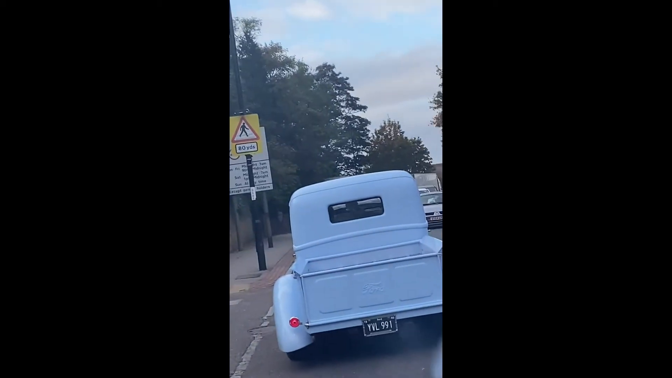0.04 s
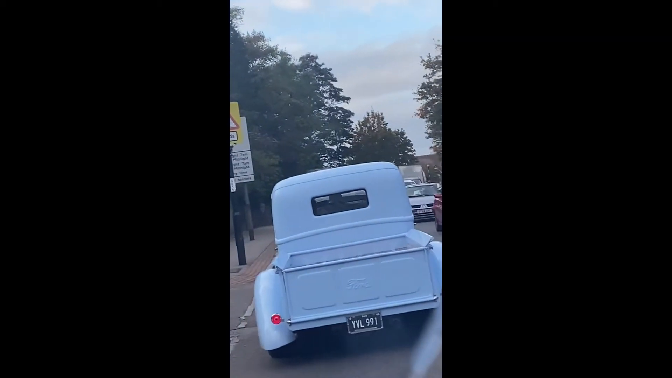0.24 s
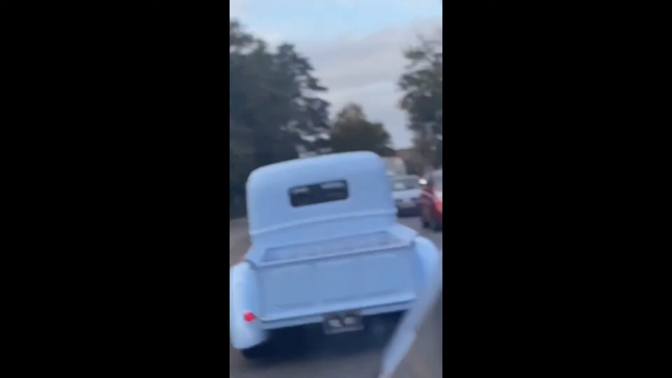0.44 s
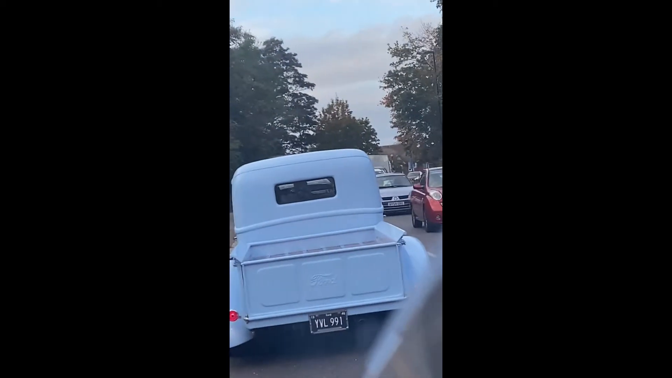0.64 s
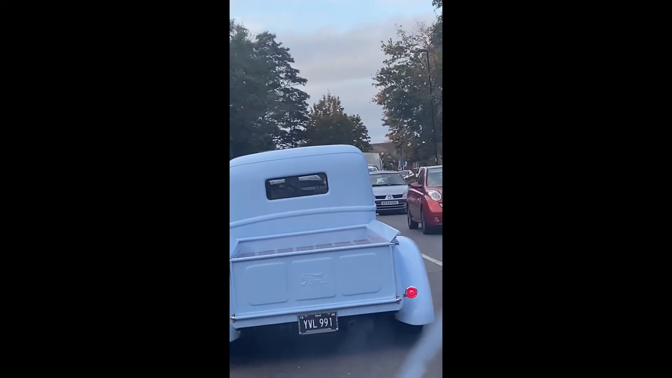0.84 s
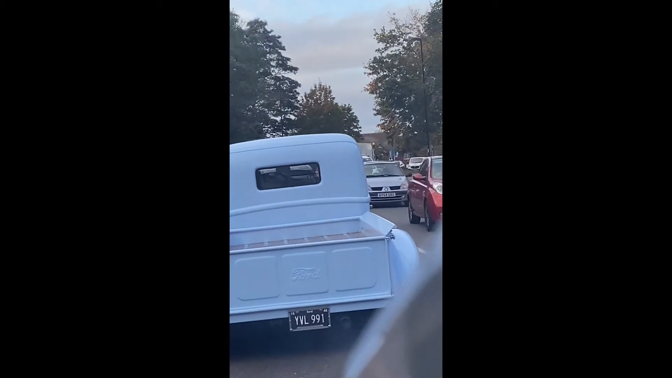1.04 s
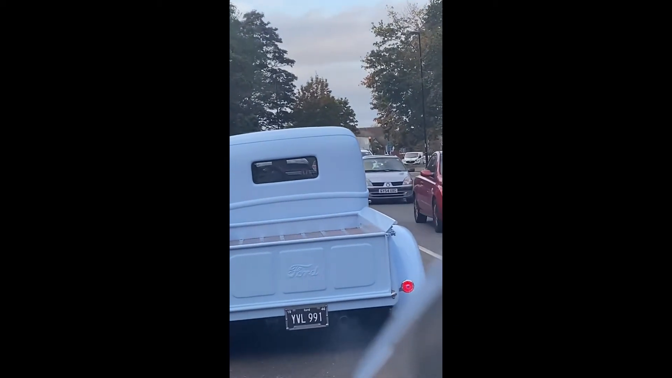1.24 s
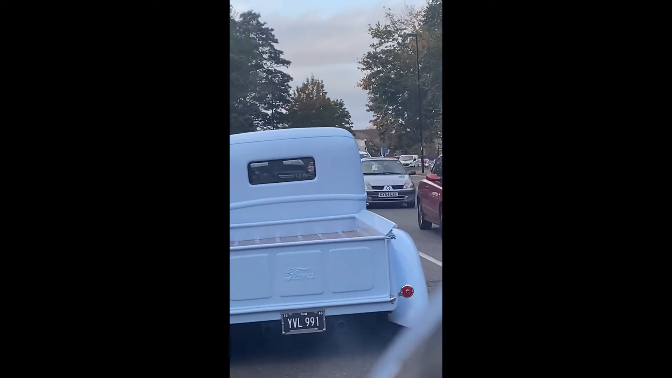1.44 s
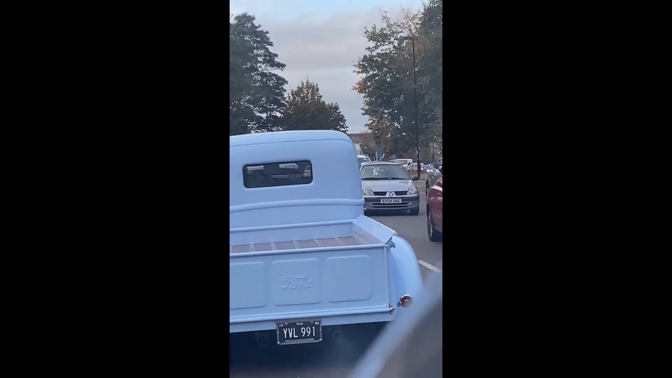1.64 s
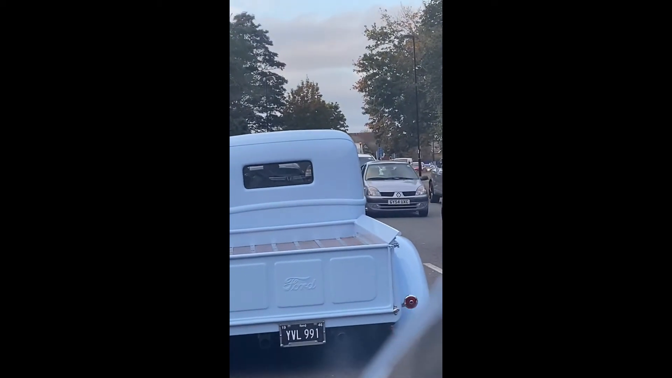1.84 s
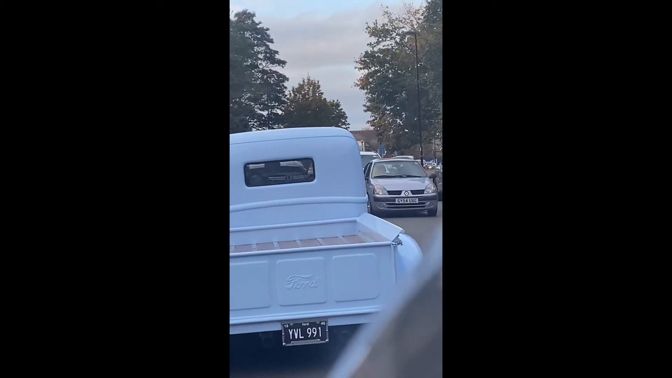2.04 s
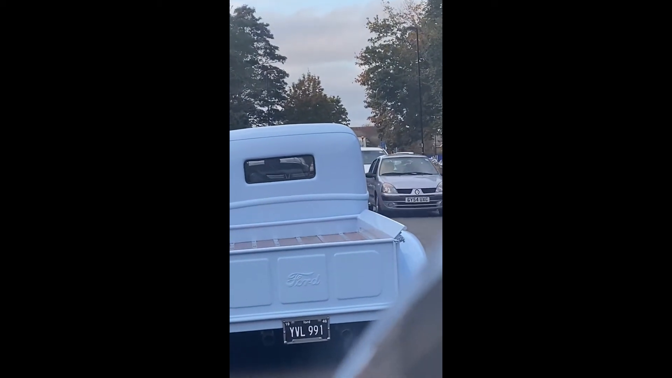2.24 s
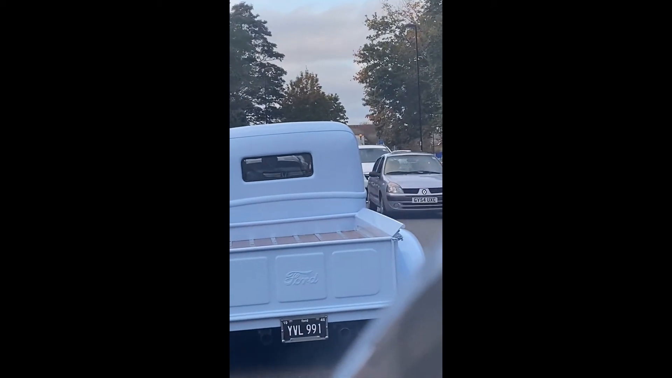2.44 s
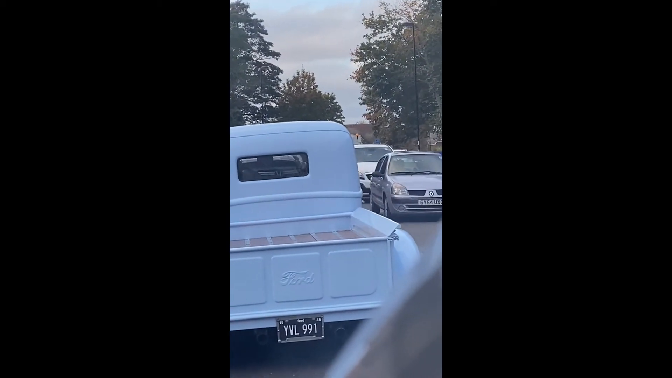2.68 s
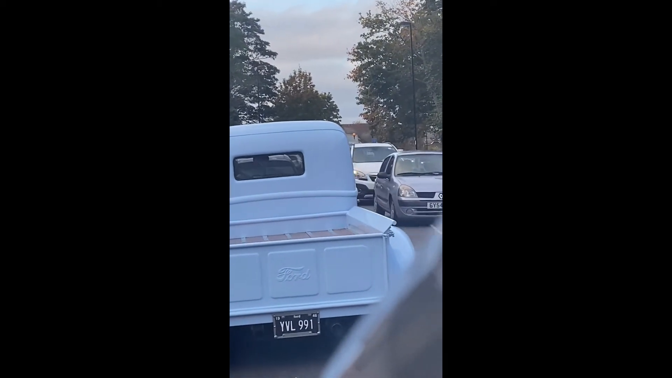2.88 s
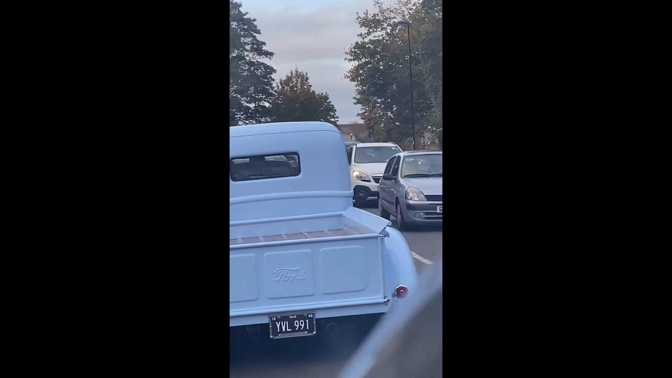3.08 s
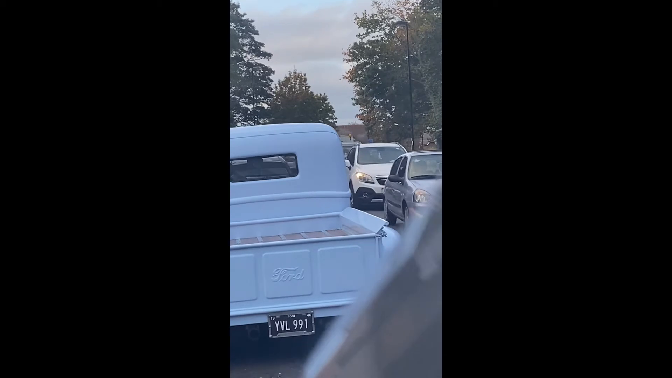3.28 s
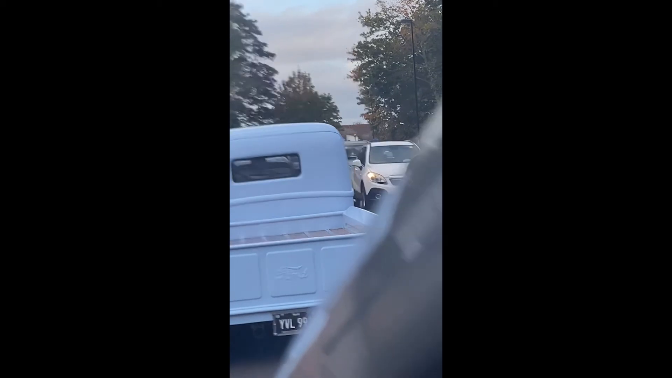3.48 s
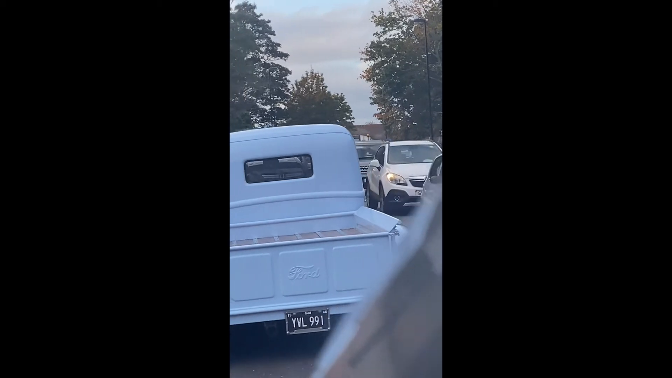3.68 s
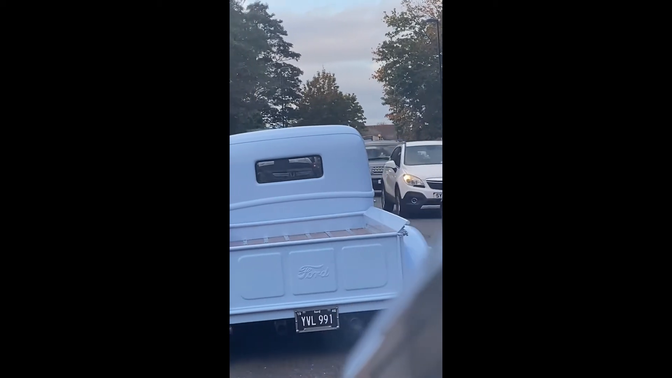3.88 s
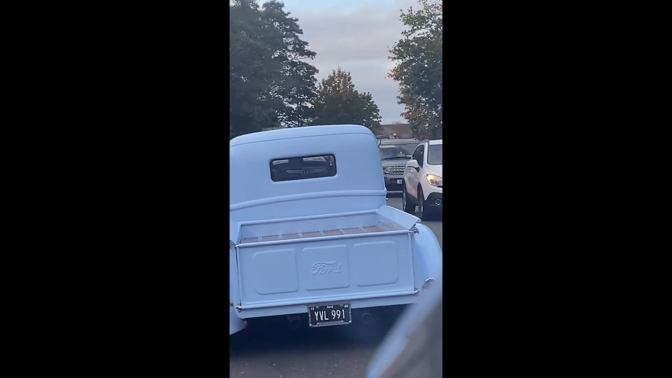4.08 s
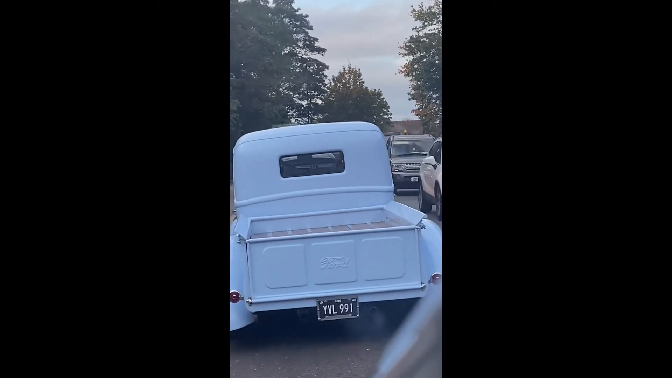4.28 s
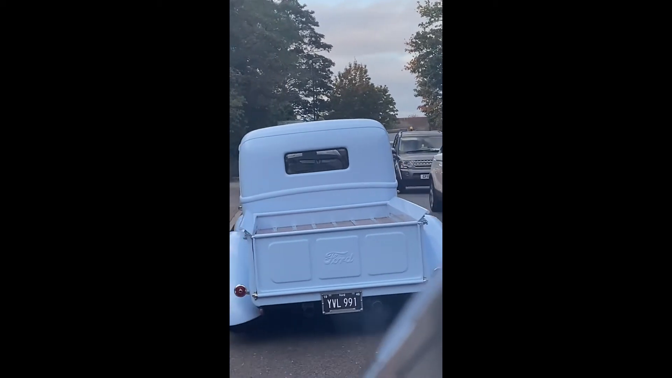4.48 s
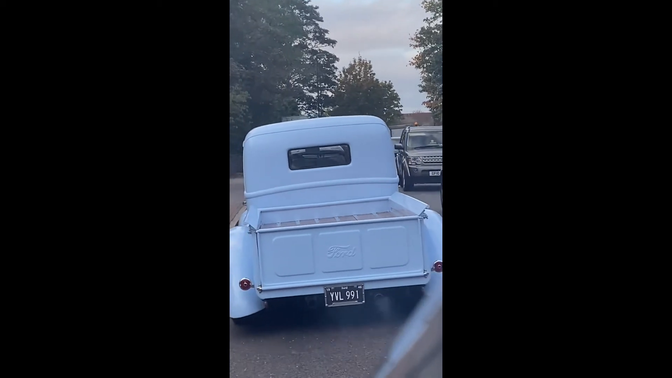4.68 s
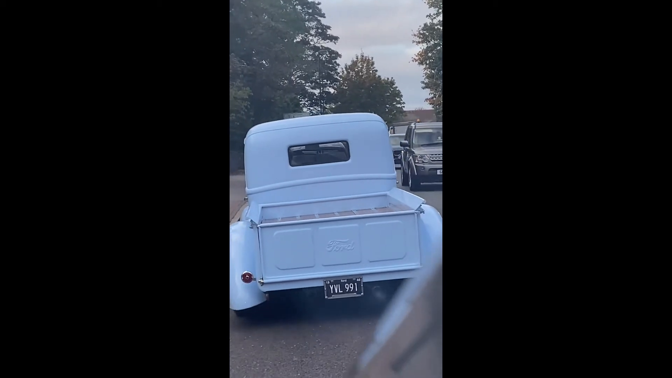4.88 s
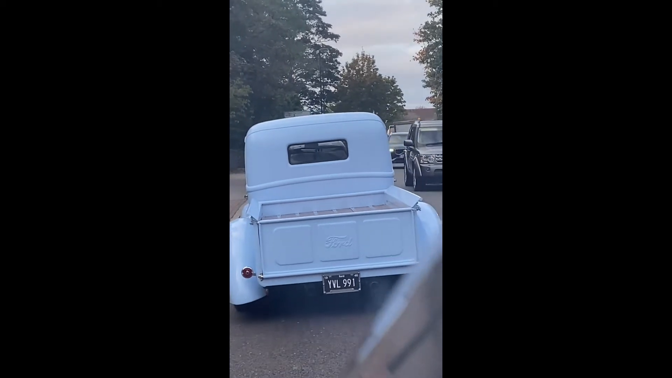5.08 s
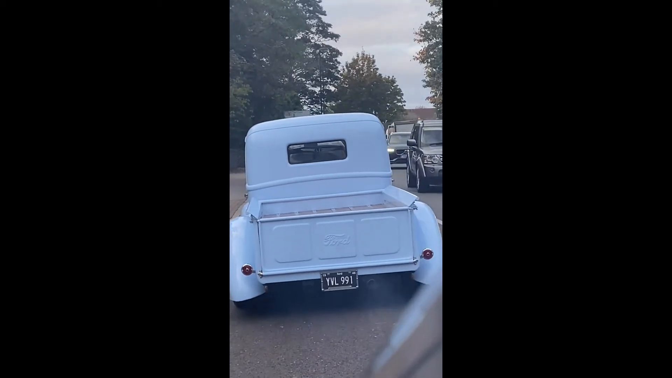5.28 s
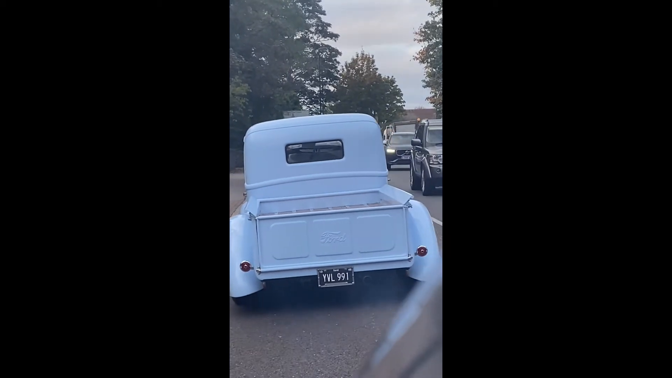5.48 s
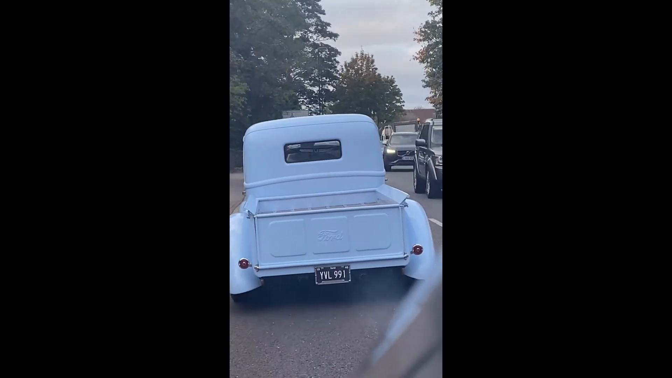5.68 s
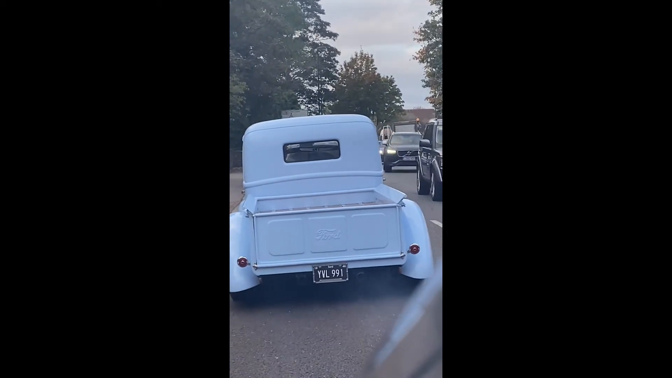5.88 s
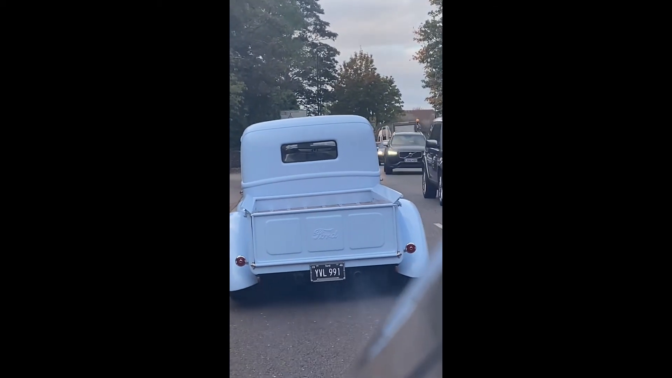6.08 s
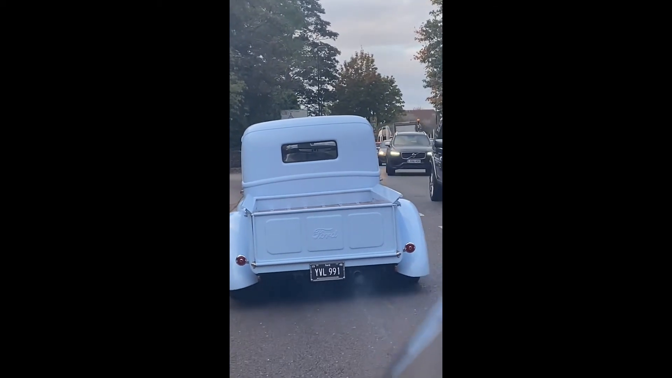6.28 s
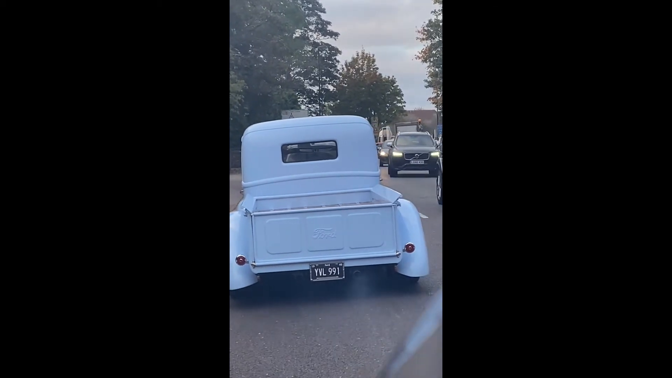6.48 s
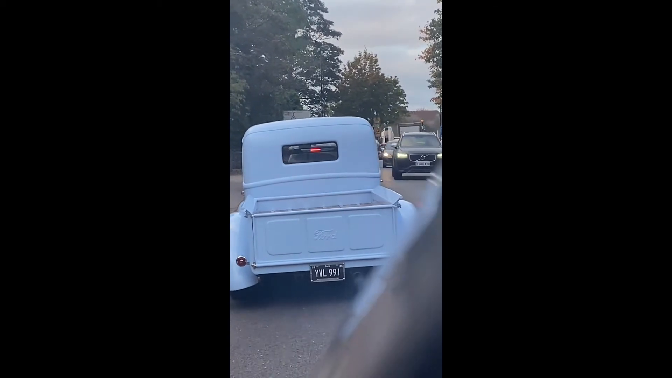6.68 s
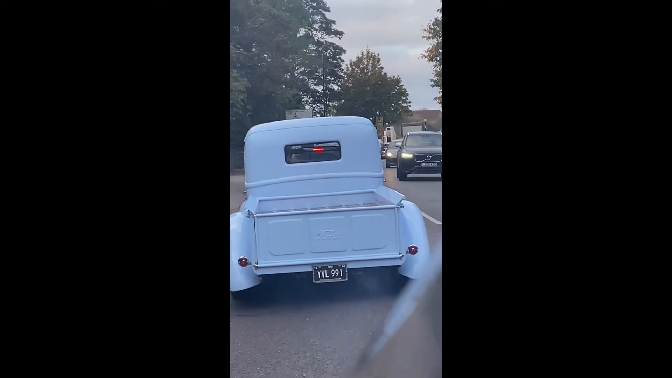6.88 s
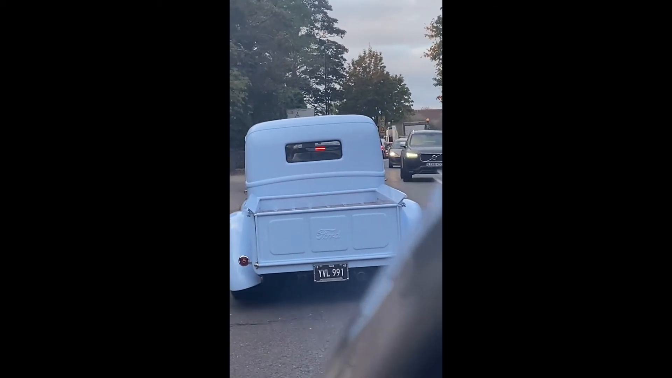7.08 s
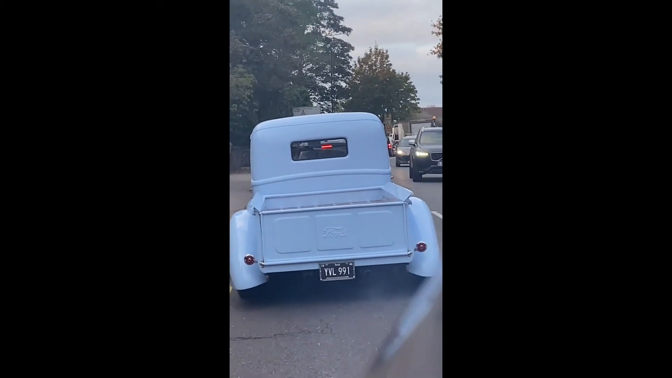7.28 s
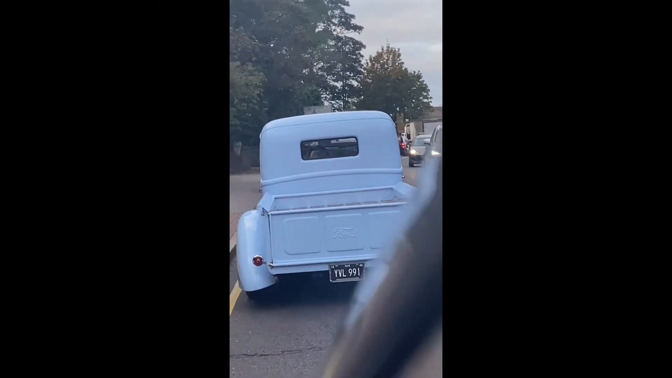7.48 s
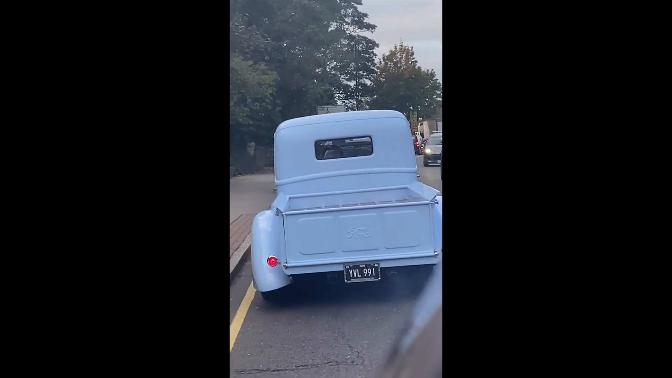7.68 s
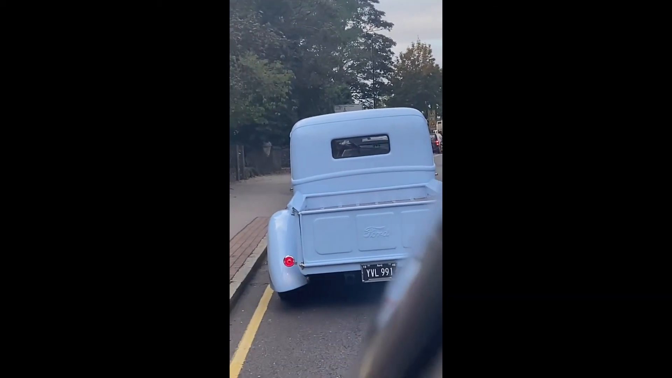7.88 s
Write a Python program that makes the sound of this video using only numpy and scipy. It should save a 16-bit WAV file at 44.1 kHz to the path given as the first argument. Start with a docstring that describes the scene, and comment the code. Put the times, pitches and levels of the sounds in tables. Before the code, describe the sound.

Heard from a car close behind, an old V8 pickup crawls along a town street. A passing car's tyre swish fades while the exhaust is muffled and lumpy; it opens up after about a second. High brake squeals come and go in the first two seconds, then faintly. The drone dips, then pulls fuller and smoother before easing, with gassy puffs over steady road wash.

```python
"""A car swishes off: tyre noise and its road echo. Ahead, an old V8 pickup crawls along a town street,
heard from the car behind: tones at the firing rate drone and pulses ringing the exhaust pipes burble.
Noise puffs chuff and spit per firing, some cylinders harder; bursts cough and short sines knock.
Gliding, fluttering tones squeal as brakes; shaped noise is road wash and grit, faint tones a whine.
The sound starts wide and draws in to the middle."""
import sys
import numpy as np
from scipy import signal
from scipy.fft import rfft, irfft
from scipy.io import wavfile
from scipy.ndimage import uniform_filter1d

SR = 44100
rng = np.random.default_rng(int(sys.argv[2]) if len(sys.argv) > 2 else 0)


def store_pcm(level_fs):
    """Save levels as 16-bit WAV."""
    pcm = np.round(np.clip(level_fs, -1, 1) * 32767).astype(np.int16)
    wavfile.write(sys.argv[1], SR, np.atleast_2d(pcm).T)


N = 349933
TIME = np.arange(N) / SR
BINS_HZ = np.fft.rfftfreq(N, 1 / SR)


# Crankshaft speed; idle, a dab of throttle, a longer pull, easing off: t/s, speed/rpm
CRANK_SPEED = [(0.0, 793.7), (1.06, 801.3), (1.41, 871.3), (2.07, 791.7), (3.38, 781.3), (3.78, 914.4),
               (4.03, 872.8), (4.4, 929.1), (5.74, 989.3), (6.1, 921.8), (6.56, 900.6), (7.02, 902.3),
               (7.22, 879.3), (7.93, 880.4)]


def crank_rpm():
    """Crankshaft speed at every sample."""
    return curve(CRANK_SPEED)


# Pulse scatter by speed: speed/rpm, strength spread (rms), timing drift/firing intervals (rms)
RAGGEDNESS = [(800, .31, .022), (890, .22, .013), (940, .08, .003)]


def firings(drift_hz=9):
    """Running count of firings: eight in two crankshaft turns, uneven near idle."""
    rpm = crank_rpm()
    speeds, _, drifts = np.transpose(RAGGEDNESS)
    even_count = np.cumsum(rpm * 4 / 60) / SR
    return even_count + np.interp(rpm, speeds, drifts) * wander(drift_hz)


def load(lead_s, idle_rpm=790, pull_rpm=955):
    """Engine load, 0 idle to 1 full pull: it leads the speed while the flywheel catches up."""
    rpm = crank_rpm()
    climb_rpm_per_s = uniform_filter1d(np.gradient(rpm) * SR, size=SR // 8)
    return np.clip((rpm + lead_s * climb_rpm_per_s - idle_rpm) / (pull_rpm - idle_rpm), 0, 1)


def muted(opens_s, opening_s=0.017):
    """Exhaust muting, 1 to 0: it opens up as the truck swings into line ahead."""
    return (1 - np.tanh((TIME - opens_s) / (2 * opening_s))) / 2


def voice_db(idle_db, pull_db, muted_db, opens_s, flywheel_s=.025):
    """Level of one exhaust voice: it follows the load and loses level while muted."""
    return idle_db + pull_db * load(flywheel_s) - muted_db * muted(opens_s)


# Low notes swelling and fading against each other:
# t/s, 1/e half length/s, fundamental/dB, octave/dB, burble/dB
VOICE_SWELLS = [(.15, .15, -1, -4, -1), (0.47, 0.13, -11, -4, 6), (.8, .13, -3, 0, 0),
                (1.31, .05, .5, 3, 0), (1.46, .05, -1.5, 2.5, 1), (2.45, .5, .7, 0, -1),
                (3.47, 0.12, 3.5, -5.5, 1), (3.8, .07, 0, 0, 2.5), (4.2, 0.49, .5, 1.5, 1),
                (5.09, 0.22, -15, -2.5, -.5), (5.6, .16, -2, 0, -1), (5.922, 0.13, 2, -11.5, 0),
                (6.2, .17, 3, -1.5, -2), (6.5, .1, 0, 2, -1), (6.79, 0.19, -9, 2, -2),
                (7.48, 0.085, 1, -4, 3), (7.86, .1, -1, 1.5, 1)]


def swells_db():
    """Passing level changes of fundamental, octave and burble."""
    return sum(np.outer(db, bump(s, half_s)) for s, half_s, *db in VOICE_SWELLS)


# Weak firings: t/s, depth/dB
WEAK_FIRINGS = [(1.55, 3), (1.66, 3), (2.13, 4), (2.42, 9), (2.74, 8), (3.02, 7), (3.33, 6), (6.32, 3),
                (7.1, 8), (7.2, 4), (7.66, 4)]


def stumbles_db(half_s=.034):
    """Brief level sags where a few firings are weak."""
    return -sum(db * bump(s, half_s) for s, db in WEAK_FIRINGS)


# Drone voices: idle level/dB, added by full pull/dB, lost while muted/dB, opening t/s
FUNDAMENTAL_VOICE = (-16.5, -2.3, 10, 1.16)
OCTAVE_VOICE = (-25, -2.5, 16, 1.22)


def drone(fired, lag=0.43, waver=0.075, throb=0.083, weakest=0.34, octave_waver=0.23,
          octave_stumble=1.13, resonance_db=11.5):
    """What all firings share: firing-rate tone and octave, dipping once per round of cylinders."""
    first_swell_db, second_swell_db, _ = swells_db()
    sag_db = stumbles_db()
    resonant = np.interp(crank_rpm(), [752, 925], [0, 1])  # octave climbs into the pipe's resonance
    first = amp(voice_db(*FUNDAMENTAL_VOICE) + first_swell_db + sag_db)
    second_db = voice_db(*OCTAVE_VOICE) + resonance_db * resonant
    second = amp(second_db + second_swell_db + octave_stumble * sag_db)
    second = second * (1 + octave_waver * wander(39.0))
    angle = 2 * np.pi * (fired - lag)
    swing = np.pi * (1 - resonant)  # octave lags as it nears resonance
    tones = first * np.cos(angle) + second * np.cos(2 * angle + swing)
    lope = 1 - throb * np.cos(2 * np.pi * (fired / len(FIRING_ORDER) - weakest))
    return np.sqrt(2) * tones * lope * (1 + waver * wander(32))


# Exhaust resonances: f/Hz, width at -6 dB/Hz, idle level/dB, full-pull level/dB
PIPE_MODES = [(56.4, 13.8, 17.5, 10.5), (84.4, 22, -13, -6), (121.3, 39.5, 8.5, 8), (160, 30.6, 0, 1.5),
              (182, 36, -16, -15), (218.1, 27.6, -0.5, 3), (267.6, 55, -13, -8.5), (337, 30, -15, -10),
              (394, 33, -22, -22.5), (438, 37, -19.5, -15), (464, 19, -28.5, -23.5), (575, 31, -21, -25.5),
              (669, 63, -34, -26), (780, 120, -40, -30), (990, 110, -52, -43)]


def pipe(x, levels_db, low_cut_hz=42, size=16384):
    """Causal (minimum-phase) ring of the exhaust pipes, which radiate no deep bass."""
    hz = abs(np.fft.fftfreq(size, 1 / SR))
    power = np.zeros(size)
    for (f, width, *_), db in zip(PIPE_MODES, levels_db):
        power += amp(db) ** 2 / (1 + ((hz - f) / (width / 2)) ** 2) ** 2
    gain = np.sqrt(power / (1 + (low_cut_hz / (hz + 1)) ** 10))
    log_gain = np.log(gain + 1e-5)
    ring = np.fft.ifft(np.exp(np.conj(signal.hilbert(log_gain)))).real
    return signal.oaconvolve(x, ring[:size // 2])[:N]


# Cylinders in firing order: pulse/dB, lateness/firing intervals, chuff/dB
FIRING_ORDER = [(-0.8, 0.057, -10.5), (-6, -0.047, -18), (-6.5, -0.037, -5), (-4, 0.091, 0),
                (-3.5, 0.0095, 2), (-3.5, 0.076, 11), (-4, 0.038, -7), (-12.5, 0.0093, -5)]
# Burble: idle level/dB, added by full pull/dB, lost while muted/dB, opening t/s
BURBLE_VOICE = (-28, 7, 11, 1.42)


def burble(fired, opens=0.1602, jitter=.006, stumble=0.2, throttle_lead_s=0.24,
           thin_db=9, thin_below_hz=175, fills_s=1.13):
    """One pulse per firing rings the pipes: ragged at idle, its resonances shifting with throttle."""
    count = int(fired[-1])
    pulse_db, late, _ = np.array(FIRING_ORDER)[np.arange(count) % len(FIRING_ORDER)].T
    strength, timing = rng.standard_normal((count, 2)).T
    at = np.searchsorted(fired, np.arange(count) + opens + late + jitter * timing).clip(0, N - 1)
    speeds, spreads, _ = np.transpose(RAGGEDNESS)
    scatter = np.interp(crank_rpm()[at], speeds, spreads)
    pulses = np.bincount(at, amp(pulse_db) + scatter * strength, N)
    for k in (1, 2):  # the two lowest firing harmonics belong to the drone
        turn = np.exp(2j * np.pi * k * fired)
        pulses = pulses - 2 * (turn * np.mean(pulses / turn)).real
    hz, _, idle_db, pull_db = np.transpose(PIPE_MODES)
    throttle, thin = load(throttle_lead_s), muted(fills_s)
    clear = pulses * (1 - thin)
    rung = pipe(clear * (1 - throttle), idle_db) + pipe(clear * throttle, pull_db)
    rung = rung + pipe(pulses * thin, idle_db - thin_db * (hz < thin_below_hz))  # muted: thin
    rung = in_band(street(rung), (150, 480))
    return amp(voice_db(*BURBLE_VOICE) + swells_db()[2] + stumble * stumbles_db()) * rung


def street(x, echoes=((.009, -14), (.0272, -15), (.05, -20))):
    """Tailgate, bonnet and house fronts return the sound: delay/s, level/dB."""
    return x + sum(amp(db) * np.interp(TIME - delay, TIME, x, left=0) for delay, db in echoes)


def puffs(fired, opens, fade, steady, scatter_db, cylinder_share):
    """Gas-flow envelope: a quick burst per firing, uneven by cylinder and chance; fade in firings."""
    number, since = np.divmod(fired - opens + len(FIRING_ORDER), 1)
    number = number.astype(int)
    size_db = cylinder_share * np.array(FIRING_ORDER)[number % len(FIRING_ORDER), 2]
    size_db = size_db + scatter_db * rng.uniform(0.46, 1, number.max() + 1)[number]
    burst = amp(size_db) * np.exp(-since / fade) * (1 - np.exp(-since / (fade / 3)))
    return evened(steady + evened(burst))


# Chuff colour: f/Hz, level/dB
CHUFF_COLOUR = [(100, -29), (300, 2), (600, 3.5), (950, -7.5), (1500, -22.5), (2400, -21), (4000, -43),
                (9000, -46)]
# Chuff before trim: idle level/dB, added by full pull/dB, lost while muted/dB, opening t/s
CHUFF_VOICE = (-39.5, 3, 5, 1.1)


def chuff(fired, trim_db=-3):
    """Hollow puffs of exhaust gas, one per firing: shaped noise."""
    gas = in_band(noise(CHUFF_COLOUR), (480, 1000))
    puff = puffs(fired, opens=0.11, fade=0.85, steady=0.33, scatter_db=-1.0, cylinder_share=0.47)
    return gas * amp(voice_db(*CHUFF_VOICE) + trim_db) * puff


# Harder exhaust puffs: t/s, level before trim/dB, centre f/Hz
HARD_PUFFS = [(0.511, -26, 524), (.655, -26, 480), (.833, -29.5, 600), (1.146, -26, 680), (1.289, -24, 745),
              (1.425, -21.5, 716), (1.712, -24, 710), (1.86, -26.5, 690), (2.005, -21.5, 700),
              (2.21, -27, 683), (2.625, -22, 720), (2.918, -21, 746), (3.123, -29, 567), (3.225, -39, 700),
              (3.381, -18, 547), (3.445, -18, 483), (3.535, -20.5, 734), (3.581, -27.5, 650),
              (3.669, -25, 740), (3.798, -29.5, 735), (3.933, -23.5, 795), (4.068, -22.5, 830),
              (4.206, -23, 800), (4.463, -22, 725), (4.843, -39, 840), (5.209, -28, 830),
              (5.448, -28.5, 720), (6.489, -20.5, 814), (6.752, -24, 810), (7.16, -24, 866),
              (7.285, -32.5, 835), (7.432, -24, 1010), (7.563, -29, 960), (7.708, -24.5, 920),
              (7.858, -27, 990)]


def coughs(trim_db=-6, rise_s=0.0057, fade_s=0.023, octaves=0.59, rattle=0.37):
    """Harder puffs: rattling gas bursts, each with its own hollow pitch."""
    return amp(trim_db) * bursts(HARD_PUFFS, rise_s, fade_s, octaves) * (1 + rattle * wander(130))


# Hollow knocks while idling: t/s, peak/dB, f/Hz
IDLE_KNOCKS = [(.699, -23, 440), (.744, -29, 560), (.765, -24, 480), (.805, -27, 524), (.873, -25.5, 442),
               (.954, -28, 410), (1.113, -28, 620)]


def knocks(swell_s=0.0017, size=2048):
    """Each knock is a few cycles of one hollow note."""
    age, out = np.arange(size) / SR, np.zeros(N)
    envelope = age / swell_s * np.exp(1 - age / swell_s)
    for s, db, hz in IDLE_KNOCKS:
        out[round(s * SR):][:size] += amp(db) * envelope * np.sin(2 * np.pi * hz * age)
    return out


# Hiss colour: f/Hz, level/dB
HISS_COLOUR = [(700, -13), (2000, 8), (3200, 5), (5400, 5), (6500, 0), (8000, -17), (10000, -5),
               (12000, -7.5), (14000, -13.5), (16000, -18)]
# Hiss before trim: t/s, level/dB
HISS_LEVEL = [(0.05, -52.5), (0.07, -53.5), (0.62, -49), (2.04, -50), (3.96, -47), (5.82, -48), (6.02, -51),
              (7.9, -50.5)]


def sizzle(fired, trim_db=-1.03, flicker_db=1.5):
    """Fine hiss that spits in time with the firings."""
    gas = in_band(noise(HISS_COLOUR), (3000, 5400))
    spit = puffs(fired, opens=0.23, fade=0.3, steady=1.8, scatter_db=2.5, cylinder_share=0.3)
    return amp(curve(HISS_LEVEL) + trim_db + flicker_db * wander(36)) * gas * spit


# Brake squeals: peak t/s, rise/s, fall/s, f/Hz, glide/(Hz/s), level/dB, f spread/Hz (rms)
BRAKE_SQUEALS = [(.81, .025, .025, 8350, -100, -52, 70), (.935, .032, .058, 6015, 0, -34.5, 35),
                 (1.05, .07, .07, 6000, 0, -43.5, 35), (1.25, .085, .08, 8560, 600, -44, 100),
                 (1.52, .11, .11, 8530, -100, -51, 100), (1.574, .018, .026, 5950, -400, -34.5, 35),
                 (1.66, .04, .062, 5920, -150, -31, 40), (1.7, .07, .075, 8560, 200, -41, 110),
                 (1.98, .16, .15, 8530, -100, -52, 90), (3.05, .13, .11, 8480, 100, -47.5, 65),
                 (4.16, .11, .11, 8430, -100, -41, 45)]


def brakes(grain=.32, grain_hz=85, overtone_db=-27, tail_s=.04, tail_db=-12, size=8192):
    """A brake sings on one mode; the pad grabs and slips, the note flutters, the street smears it."""
    shiver, out = wander(250), np.zeros(N)
    grip = 1 + grain * (wander(grain_hz) + 1j * wander(grain_hz))
    grip = grip / np.sqrt(1 + 2 * grain ** 2)
    for s, rise, fall, hz, glide, db, spread in BRAKE_SQUEALS:
        near = abs(TIME - s) < .5
        t = TIME[near] - s
        pitch_hz = hz + glide * t + spread * shiver[near]
        turn = np.exp(2j * np.pi * np.cumsum(pitch_hz) / SR)
        swell = np.exp(-abs(t / np.where(t < 0, rise, fall)) ** 2.3 / 2)
        out[near] += amp(db) * swell * (grip[near] * (turn + amp(overtone_db) * turn ** 2)).real
    tail = rng.standard_normal(size) * np.exp(-np.arange(size) / SR / tail_s)
    return out + amp(tail_db) * signal.oaconvolve(out, tail / np.linalg.norm(tail))[:N]


# Tyre swish colour: f/Hz, level/dB
SWISH_COLOUR = [(200, -4), (500, -20), (1100, -6), (1700, -6.5), (2600, -21), (5000, -36), (12000, -45)]


def passing_car(peak_s=0.28, length_s=0.75, level_db=-39, echo_s=0.00314, echo_drift=0.0019, echo=0.27):
    """Tyre swish with a road echo whose delay grows, so its colour slides down."""
    tyres = noise(SWISH_COLOUR)
    bounced = np.interp(TIME - echo_s - echo_drift * TIME, TIME, tyres)
    return amp(level_db) * evened(tyres + echo * bounced) * bump(peak_s, length_s)


# Grit ticks: t/s, level before trim/dB, centre f/Hz
GRIT_TICKS = [(1.431, -30.5, 4070), (2.526, -33, 3330), (3.019, -34, 4300), (3.038, -38, 3970),
              (3.133, -44, 5630), (3.19, -34, 5260), (3.348, -36, 5630), (3.53, -34, 4820),
              (3.547, -31, 3500), (3.581, -31, 3600), (3.669, -37, 4200), (3.719, -34, 3980),
              (3.986, -33, 4200), (4.123, -35, 3960)]


def ticks(trim_db=-1, rise_s=.0004, fade_s=.0028, octaves=.4):
    """Dry little noise ticks, as of grit under the tyres."""
    return amp(trim_db) * bursts(GRIT_TICKS, rise_s, fade_s, octaves)


# Road wash colour: f/Hz, level/dB
WASH_COLOUR = [(10, 1), (30, 16), (60, 26), (150, 14.5), (300, 8.5), (600, 5), (1000, 3.5), (1500, 3),
               (1850, -2.5), (2250, -2), (2900, -13.5), (5000, -32), (9000, -16.5), (16000, -57)]
# Road wash before trim: t/s, level/dB
ROAD_LEVEL = [(1.0, -40), (3.32, -41), (3.78, -39.5), (7.69, -40.5), (7.9, -38.5)]


def road(trim_db=-1.5, flutter_db=1.07):
    """Steady noise wash of tyres and town traffic."""
    wash = in_band(noise(WASH_COLOUR), (1100, 2500))
    return amp(curve(ROAD_LEVEL) + trim_db + flutter_db * wander(19)) * wash


# Whine tones, before gain: f/Hz, level/dB
WHINE_TONES = [(888, -55.5), (990, -58)]
# Whine gain: t/s, gain/dB
WHINE_GAIN = [(1.0, 0), (1.55, 8), (2.3, 3.5), (3.1, 3.5), (3.5, 11), (4.4, 1), (5.0, 3.5), (7.9, 4.5)]


def whine(waver_hz=3, flutter=0.5):
    """Faint wavering tones, as of a fan in the following car."""
    tones = np.zeros(N)
    for hz, db in WHINE_TONES:
        level = amp(db) * np.sqrt(2) * (1 + flutter * wander(6))
        tones += level * np.sin(2 * np.pi * np.cumsum(hz + waver_hz * wander(6.2)) / SR)
    return amp(curve(WHINE_GAIN)) * tones


# Left-over-right phase lead between ports: f/Hz, lead/rad
PORT_LEAD = [(0, 0), (3600, 0), (5200, .45), (7300, np.pi), (10500, 2 * np.pi), (13700, 3 * np.pi),
             (16000, 12.6)]
# Likeness of the two ports: f/Hz, likeness (0 to 1)
PORT_SAMENESS = [(60, .9998), (140, .9995), (250, .994), (700, .98), (1400, .978), (2300, .955),
                 (3400, .965), (4500, .89), (6200, .84), (9000, .88), (15000, .86)]


def ports(x):
    """Two close ports hear one sound, with opposite diffuse shares and a treble phase lag."""
    same = np.clip(read(PORT_SAMENESS, BINS_HZ), 0, 1)
    direct = np.sqrt((1 + same) / 2) * rfft(x)
    diffuse = np.sqrt((1 - same) / 2) * rfft(scattered(x))
    lag = np.exp(-1j * np.interp(BINS_HZ, *np.transpose(PORT_LEAD)))
    return irfft(np.array([direct + diffuse, (direct - diffuse) * lag]), N)


# Phase of side over middle: t/s, lead/rad
SIDE_PHASE = [(.8, 1.3), (1.3, 1.05), (2.2, 1.05), (3.2, 1.28)]
# Low-middle spreads: t/s, 1/e half length/s, side over middle/dB
LOW_MID_SPREADS = [(6.22, .09, -6), (7.04, .11, -4.5), (7.55, .17, -11)]


def widen(pair, start_hz=1500, narrow_s=0.93, start_db=-4.0, sink_db_per_s=.7,
          airy_db=-2.0, airy_db_per_s=8, airy_hz=420, airy_octaves=1.87,
          spread_hz=340, spread_octaves=1.24, size=4096):
    """Wide and diffuse at first, drawing in with the deepest notes last; late brief low-mid spreads."""
    middle = pair.mean(0)
    hz, t, (mid, diffuse) = signal.stft([middle, scattered(middle)], SR, nperseg=size)
    hz = hz[:, None] + 1
    edge_hz = start_hz * np.exp(-t / narrow_s)
    early = amp(start_db - sink_db_per_s * t) / (1 + (hz / edge_hz) ** 6)
    airy = amp(airy_db - airy_db_per_s * t) * np.exp(-(np.log2(hz / airy_hz) / airy_octaves) ** 2)
    spread = sum(amp(db) * bump(s, half_s) for s, half_s, db in LOW_MID_SPREADS)
    late = np.interp(t, TIME, spread) * np.exp(-(np.log2(hz / spread_hz) / spread_octaves) ** 2)
    turn = np.exp(1j * np.interp(t, *np.transpose(SIDE_PHASE)))
    side_bins = mid * early * turn + diffuse * (airy + late)
    side = signal.istft(side_bins, SR, nperseg=size)[1][:N]
    return pair + np.array([side, -side])


def scattered(x, spread_s=0.028, size=16384):
    """Diffuse reflections: same colour and level, phases shuffled."""
    taps = rng.standard_normal(size) * np.exp(-np.arange(size) / SR / spread_s)
    return irfft(rfft(x) * np.exp(1j * np.angle(rfft(taps, N))), N)


def bursts(rows, rise_s, fade_s, octaves, size=8192):
    """One noise burst per row, coloured around its own centre."""
    age, hz = np.arange(size) / SR, np.fft.rfftfreq(size, 1 / SR)
    shape = (1 - np.exp(-age / rise_s)) * np.exp(-age / fade_s)
    out = np.zeros(N + size)
    for s, db, centre_hz in rows:
        colour = 1 / (1 + abs(np.log2((hz + 1) / centre_hz) / octaves) ** 3)
        grain = evened(irfft(rfft(rng.standard_normal(size)) * colour))
        out[round(s * SR):][:size] += amp(db) * shape * grain
    return out[:N]


def amp(db):
    """Decibels to gain."""
    return 10 ** (np.asarray(db) / 20)


def evened(x):
    """Scales to an rms of one."""
    return x / np.sqrt(np.mean(x ** 2) + 1e-20)


def curve(rows):
    """A (t/s, value) table at every sample."""
    return np.interp(TIME, *np.transpose(rows))


def bump(s, half_s):
    """Gaussian rise to one and back around a moment; half_s is to 1/e."""
    return np.exp(-((TIME - s) / half_s) ** 2)


def read(points, hz):
    """A spectrum table on a log-frequency axis."""
    f, value = np.transpose(points)
    return np.interp(np.log(hz + 1), np.log(f + 1), value)


def noise(spectrum):
    """Noise of the given colour."""
    return irfft(rfft(rng.standard_normal(N)) * amp(read(spectrum, BINS_HZ)), N)


def wander(hz):
    """Slow chance with an rms of one, up to about the given rate."""
    return evened(irfft(rfft(rng.standard_normal(N)) * np.exp(-(BINS_HZ / hz) ** 2), N))


def in_band(x, band_hz):
    """Scales a sound so that its part within the band has an rms of one."""
    low, high = band_hz
    return x / np.std(irfft(rfft(x) * (BINS_HZ > low) * (BINS_HZ < high), N))


def scene(chuff_pan_db=1.3, burble_pan_db=0.87):
    """The exhaust sits ahead, its burble and puffs a little left, amid the street."""
    fired, sides = firings(), np.array([[.5], [-.5]])
    exhaust = drone(fired) + ports(burble(fired)) * amp(sides * burble_pan_db)
    exhaust = exhaust + ports(chuff(fired) + coughs() + knocks()) * amp(sides * chuff_pan_db)
    surroundings = sizzle(fired) + brakes() + passing_car() + ticks() + road() + whine()
    return widen(exhaust + ports(surroundings))


def record(dry, edge_hz=15800):
    """Band limit: a linear-phase low-pass."""
    taps = signal.firwin(511, edge_hz, window=("kaiser", 9), fs=SR)
    return signal.oaconvolve(dry, taps[None], "same")


dry = scene()
out = record(dry)
store_pcm(out)
```